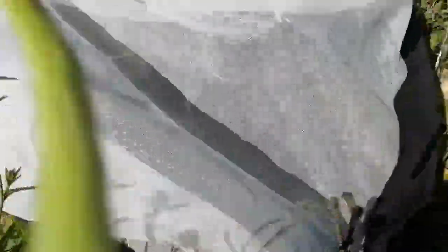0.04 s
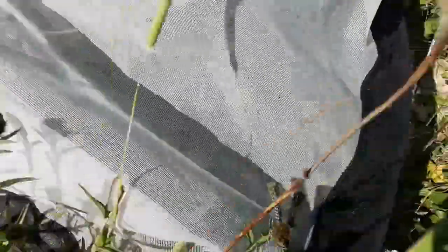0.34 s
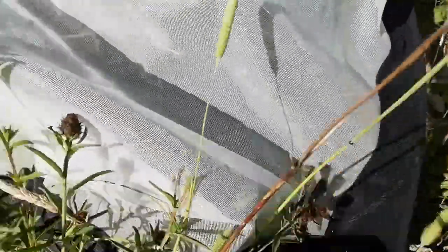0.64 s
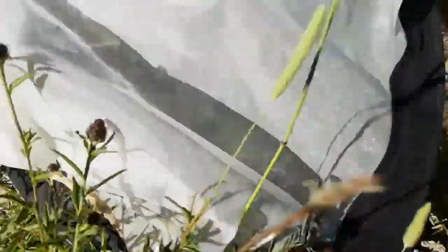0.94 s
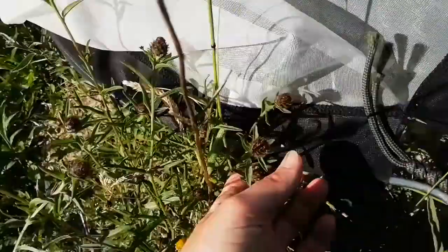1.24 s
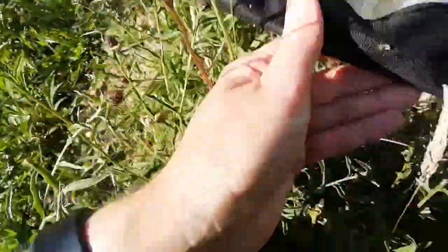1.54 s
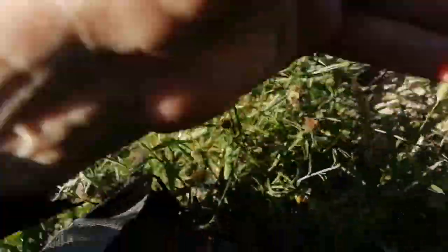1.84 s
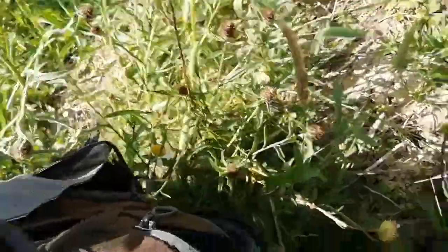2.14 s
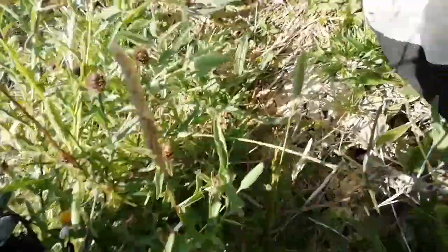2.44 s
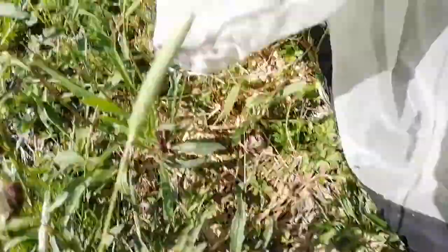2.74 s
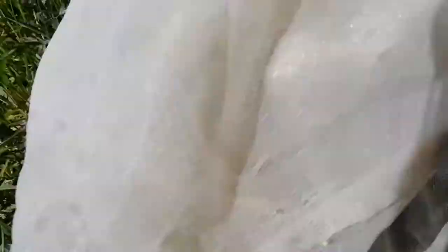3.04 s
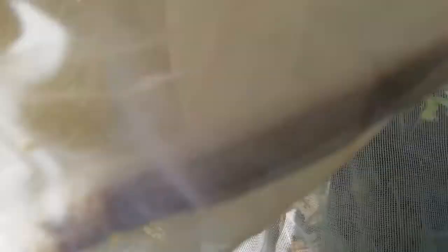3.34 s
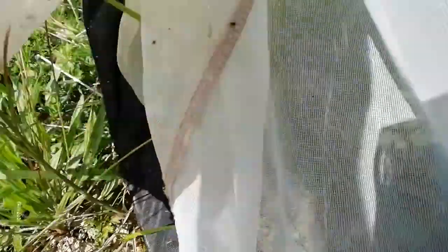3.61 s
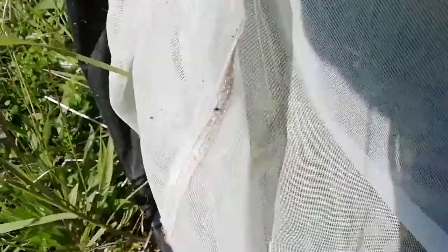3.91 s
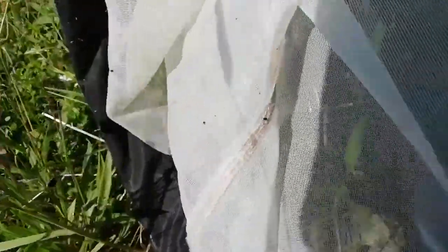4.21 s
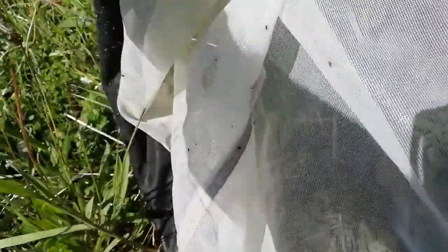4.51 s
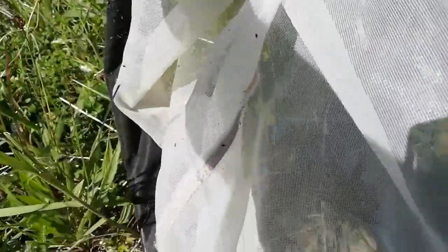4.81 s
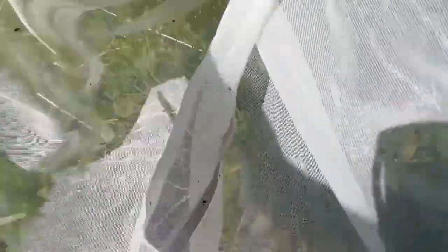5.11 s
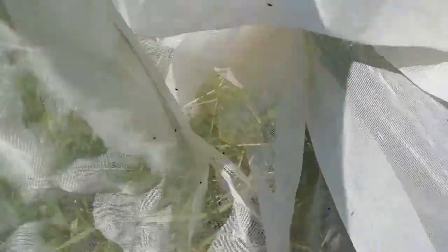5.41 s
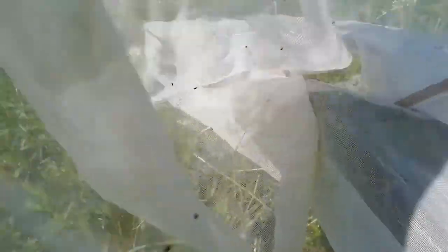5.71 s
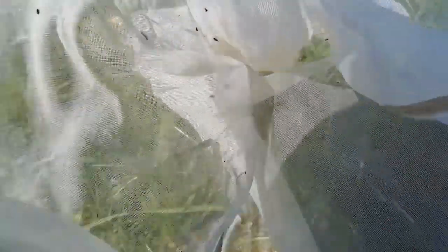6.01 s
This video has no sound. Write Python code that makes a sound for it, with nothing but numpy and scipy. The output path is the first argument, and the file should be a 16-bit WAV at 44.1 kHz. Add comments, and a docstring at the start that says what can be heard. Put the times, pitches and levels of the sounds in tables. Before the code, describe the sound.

Mesh netting hisses and crackles as it is dragged over grass, with snapping stems, microphone bumps and light wind.

```python
"""A mesh sweep net is turned over in grass, right at a hand-held camera, above a light rumbling wind.
At first stems snap and fingers rub and bump the camera near its right microphone, while the mesh
hisses and crackles over the stems, pull after pull. Just after one second the metal hoop clinks once;
later, small metal fittings tinkle. Around four seconds the pulls grow faint, and at five seconds
the hiss swells again."""
import sys
import numpy as np
from scipy import signal
from scipy.fft import rfft, irfft, next_fast_len
from scipy.io import wavfile
from scipy.ndimage import uniform_filter1d, map_coordinates

SR = 44100
rng = np.random.default_rng(int(sys.argv[2]) if len(sys.argv) > 2 else 0)


def unload_wav(signal):
    """Save mono or channel-first audio to the path in sys.argv[1] as 16-bit WAV at rate SR, clipped to [-1, 1]."""
    wavfile.write(
        sys.argv[1],
        SR,
        np.round(np.clip(np.atleast_2d(signal).T, -1, 1) * 32767).astype(np.int16),
    )


N = 267246

# In the tables, t is the start time and t60 is the time a sound takes to fade by 60 dB.
# Levels are relative: each source adds its own gain. Pan is left minus right, so below 0 is to the right.


def amp(db):
    """Turn decibels into a gain to multiply by."""
    return 10 ** (np.asarray(db) / 20)


def unit(x):
    """Scale a signal to an average power of 1."""
    return x / np.sqrt(np.mean(x ** 2) + 1e-20)


def along(points, hz):
    """Read between (frequency, value) points on a logarithmic frequency axis."""
    freqs, values = np.transpose(points)
    return np.interp(np.log(hz + 1), np.log(freqs + 1), values)


def wobble(rate):
    """A smooth random curve that passes through `rate` new values a second."""
    values = rng.standard_normal(int(N * rate / SR) + 4)
    return map_coordinates(values, [np.arange(N) * rate / SR])


def filtered(x, response):
    """Multiply each frequency in x by response(frequency)."""
    size = x.shape[-1]
    padded = next_fast_len(size + 4096)
    hz = np.fft.rfftfreq(padded, 1 / SR)
    return irfft(rfft(x, padded) * response(hz), padded)[..., :size]


def coloured(x, spectrum):
    """Shape the tone of x with a table of f/Hz, level/dB."""
    return filtered(x, lambda hz: amp(along(spectrum, hz)))


def panned(pan_db):
    """Left and right gains with an average power of 1."""
    pan_db = np.atleast_1d(pan_db)
    gains = amp(np.array([pan_db, -pan_db]) / 2)
    return gains / np.sqrt(np.mean(gains ** 2, axis=0))


def add(track, start, sound):
    """Mix a stereo sound into the track at `start` seconds."""
    part = track[:, max(round(start * SR), 0):][:, :sound.shape[-1]]
    part += sound[:, :part.shape[1]]


def stereo_noise(size, alike):
    """Left and right noise, from unrelated (alike=0) to identical (alike=1)."""
    shared = np.sqrt(alike) * rng.standard_normal(size)
    return shared + np.sqrt(1 - alike) * rng.standard_normal((2, size))


def jolt(t, t60, tail_db, alike):
    """An impact: a sudden spike, a burst of noise and a fainter tail."""
    fade = amp(-60 * t / t60) + amp(tail_db - 60 * t / 0.058)
    spike = 2.5 * (np.arange(len(t)) == SR // 3000)
    return stereo_noise(len(t), alike) * fade + spike


def stroke(start, length, attack_s=0.044, sag_db_per_s=0, release_db_per_s=156):
    """Gain of one movement: it gathers speed, holds or sags, then slides to rest."""
    gain, first = np.zeros(N), max(int(start * SR), 0)
    t = np.arange(first, min(N, int((start + length + 1) * SR))) / SR - start
    fall_db = sag_db_per_s * t + release_db_per_s * np.maximum(t - length, 0)
    gain[first:first + len(t)] = np.clip(t / attack_s, 0, 1) * amp(-fall_db)
    return gain


def patchy(x, patch_db):
    """Folds come and go, each lifting or lowering its own band of frequencies for a moment."""
    bands = signal.stft(x, nperseg=512)[2]
    patches = uniform_filter1d(rng.standard_normal(bands.shape[1:]), size=5, axis=0)  # smooth over pitch
    patches = uniform_filter1d(patches, size=12, axis=1)  # smooth over time
    return signal.istft(bands * amp(patch_db * unit(patches)), nperseg=512)[1][:, :N]


def friction(spectrum, catches_per_s, spread_db, grain_db, flutter_db, alike):
    """Rubbing: tiny slips blur into a hiss, single catches stand out, and the pressure flutters."""
    caught = rng.random(N) < catches_per_s / SR
    strength = amp(spread_db * np.minimum(rng.exponential(size=N), 3))
    power = signal.lfilter([1], [1, -np.exp(-1 / (.0009 * SR))], caught * strength ** 2)  # catches fade
    pressure = amp(flutter_db * (wobble(90) + wobble(30)))
    contact = np.sqrt(1 + amp(grain_db) ** 2 * power / power.mean()) * pressure
    rubbing = patchy(contact * stereo_noise(N, alike), patch_db=2.3)
    return unit(coloured(rubbing, spectrum))


def wind():
    """Moving air: a low rumble, nearly alike at both microphones, with a faint hiss above it."""
    # Strength of the breeze: t/s, level/dB
    breeze = [(0, -60), (1.2, -56.5), (3, -56.5), (3.5, -58.5), (4.2, -61), (4.9, -59), (6.06, -59)]
    # Tone of the wind: f/Hz, level/dB
    spectrum = [(20, -8.5), (45, 1.5), (85, -3), (150, -6), (230, -13), (400, -19), (550, -31), (700, -23),
                (1000, -26), (1400, -26), (2200, -39.5), (5000, -29.5), (15000, -35.5)]
    breeze_db = np.interp(np.arange(N) / SR, *np.transpose(breeze))
    gusts = amp(.8 * wobble(9))
    return amp(breeze_db + 3) * gusts * unit(coloured(stereo_noise(N, alike=0.98), spectrum))


def fingers():
    """Skin lets go, drags over the camera beside the right microphone, slows and grips again."""
    # Finger slips: t/s, length/s, level/dB
    slips = [(-.04, 0.33, -37), (0.415, 0.028, -61), (0.556, 0.031, -33.5), (0.641, .09, -37.5),
             (0.766, 0.046, -37.5), (1.018, .05, -48), (1.568, 0.12, -51.5), (2.589, 0.057, -41),
             (2.708, 0.098, -50), (3.024, 0.22, -55.5), (5.787, 0.051, -62)]
    # Tone of rubbing skin: f/Hz, level/dB
    spectrum = [(40, -32), (120, -0.5), (500, -1), (1000, -0.5), (1500, -12.5), (2500, -12), (5000, -60),
                (12000, -32)]
    motion = amp(-69)  # the holding hand is never quite still
    for start, length, db in slips:
        motion += amp(db) * stroke(start, length, attack_s=0.0069, sag_db_per_s=39, release_db_per_s=252)
    drag = friction(spectrum, catches_per_s=900, spread_db=2, grain_db=-4, flutter_db=1.2, alike=.88)
    return amp(-1.5) * motion * drag * panned(-5)


def bumps():
    """Soft blows rock the camera with a short, low thud."""
    # Blows on the camera body: t/s, level/dB, f/Hz, t60/s
    blows = [(0.035, -21, 228, 0.0089), (0.0704, -25, 181, 0.022), (.1317, -28.5, 98, 0.14),
             (0.1479, -20, 196, 0.013), (.191, -24, 298, 0.014), (.2345, -28, 203, .021),
             (0.2573, -22.5, 186, .018), (.275, -31.5, 169, 0.058), (0.5648, -16, 240, 0.018),
             (0.7671, -24.5, 236, 0.01), (1.034, -29.5, 148, 0.015), (1.659, -25.5, 191, .023),
             (2.283, -35, 275, 0.0088), (2.514, -27, 156, 0.037), (2.649, -36, 300, 0.063),
             (2.708, -25.5, 109, 0.078), (2.851, -39.5, 157, .031), (3.189, -30, 185, 0.033),
             (4.958, -35, 336, 0.02)]
    out, t = np.zeros((2, N)), np.arange(SR // 6) / SR
    for start, db, hz, t60 in blows:
        rise = 1 - np.exp(-t / 0.00075)
        thud = np.sin(2 * np.pi * hz * t) * amp(-60 * t / t60) * rise
        add(out, start, amp(db + 0.5) * thud / np.abs(thud).max() * panned(-1.1))
    return out


def taps():
    """Stems, hoop and fingers tap: each jolt passes through one broad resonance that barely rings."""
    # Dry contacts: t/s, level/dB, f/Hz, pan/dB
    contacts = [(0.0334, -19, 870, -24), (.068, -23.5, 1300, -15), (0.1075, -24, 1070, -18),
                (0.1311, -18.5, 1210, -9), (0.1525, -20, 2840, -25), (0.5641, -8.5, 830, -9),
                (0.5647, -12, 3500, -28), (0.7669, -21.5, 636, -24), (1.027, -24.5, 850, -29),
                (1.3421, -32, 1260, -11), (1.6627, -29, 940, 36), (2.0084, -30, 3240, -4),
                (2.283, -35, 1010, -22), (2.416, -32.5, 1800, -9), (2.854, -26.5, 1570, -20),
                (3.1892, -25, 980, -7), (3.1901, -24.5, 3760, 20), (3.3155, -23.5, 1740, -11),
                (3.5332, -40, 1460, -13), (3.8291, -29.5, 4300, -9), (4.9492, -32.5, 1900, 19),
                (4.9573, -24.5, 3630, -19), (5.157, -22, 3800, -6), (5.83, -31.5, 1090, -19),
                (5.8929, -25, 1040, 3), (5.8946, -26.5, 3030, -21)]
    out, t = np.zeros((2, N)), np.arange(SR // 20) / SR
    for start, db, hz, pan_db in contacts:
        hit = jolt(t, t60=0.011, tail_db=-8, alike=0.65)
        tap = filtered(hit, lambda f: (1j * f * hz * 1.3 / (hz * hz - f * f + 1j * f * hz * 1.25)) ** 2)
        tap /= np.std(tap[:, :SR // 300])  # the first few milliseconds set the level
        add(out, start, amp(db - 14) * tap * panned(pan_db))
    return out


def tinkles():
    """Small metal fittings of the net ring, each with one thin, short tone."""
    # Rings of the fittings: t/s, level/dB, f/Hz, t60/s
    rings = [(1.825, -32.5, 4000, 0.095), (1.828, -45, 3130, 0.15), (2.0064, -35.5, 3100, 0.051),
             (2.051, -39, 7360, 0.09), (4.424, -41, 4580, .04), (4.957, -27, 3720, 0.024)]
    out, t = np.zeros((2, N)), np.arange(SR // 6) / SR
    for start, db, hz, t60 in rings:
        add(out, start, amp(db - 4 - 60 * t / t60) * np.sin(2 * np.pi * hz * t) * panned(-21))
    return out


def clink():
    """The metal hoop is struck: a dry clack and a brief ring, muffled by its cloth sleeve."""
    # The knock on the hoop: t/s, level/dB
    knocks = [(1.1458, -19)]
    # Tones the hoop rings with: f/Hz, level/dB, t60/s
    tones = [(2330, 0.5, 0.068), (2510, 1, 0.038), (2800, -10, 0.074), (3570, 1, 0.069), (3800, 0, 0.057),
             (4660, 3.5, 0.041)]
    # Tone of the clack: f/Hz, level/dB
    spectrum = [(200, -26), (600, -1), (1600, -5), (2400, 1), (4700, -1), (6000, -18), (16000, -27)]
    out, t = np.zeros((2, N)), np.arange(SR // 6) / SR
    rise = 1 - np.exp(-t / 0.00037)
    for start, db in knocks:
        ring = sum(amp(level - 60 * t / t60) * np.sin(2 * np.pi * (hz * t + rng.random((2, 1))))
                   for hz, level, t60 in tones)
        clack = coloured(jolt(t, t60=0.044, tail_db=-18, alike=0.6), spectrum)
        add(out, start, amp(db - 13.5) * (ring * rise + amp(4.5) * clack) * panned(-11))
    return out


def cracks(events):
    """Sharp cracks with a brief fizz, brighter for thin stems; events are laid out as in snaps()."""
    # Tone of a stem's crack, with the microphone port's ring near 8.5 kHz: f/Hz, level/dB
    spectrum = [(300, -53), (1200, -29.5), (2200, -19.5), (4500, -9), (6500, 0), (8200, 9), (9300, 2.5),
                (11000, -8.5), (16000, -28.5)]
    out, t = np.zeros((2, N)), np.arange(SR // 20) / SR
    for start, db, pan_db, t60, tilt in events:
        tilted = [(hz, level + tilt * np.log2(max(hz, 3000) / 8000)) for hz, level in spectrum]
        crack = coloured(jolt(t, t60, tail_db=-22, alike=.7), tilted)
        crack /= np.std(crack[:, :SR // 800])  # the first instant sets the level
        add(out, start, amp(db - 11) * crack * panned(pan_db))
    return out


def ticks(hiss_gain, per_second=14):
    """Small stems give way at random, louder under a stronger pull."""
    pull_db = 20 * np.log10(np.linalg.norm(hiss_gain, axis=0))
    events = []
    for when, strength, side, thinness in rng.random((int(per_second * N / SR), 4)):
        db = pull_db[int(when * N)] + 12.5 + 6 * (strength - .5)
        pan_db = -6 + 20 * (side - .5)
        tilt = 18 * (thinness - .5)
        events.append((when * N / SR, db, pan_db, .009, tilt))
    return cracks(events)


def snaps():
    """Single stems and threads break at set times."""
    # Breaks: t/s, level/dB, pan/dB, t60/s, treble tilt/(dB per octave)
    breaks = [(.003, -4, -33, 0.041, 5.5), (.0091, -12, -25, 0.041, -11.5), (.0338, -17, -26, 0.067, -2),
              (.058, -15, -23, .006, 3), (.108, -13.5, -13, .0063, 5), (.118, -10.5, -10, .007, -4),
              (.1294, -17, -3, 0.011, -6), (.153, -15, -30, 0.0043, -10), (.188, -12.5, -16, 0.019, -4),
              (.234, -16, -18, 0.006, -3), (.257, -9.5, -28, 0.0089, -1.5), (.3447, -7.5, -16, 0.014, 4.5),
              (.5603, -16.5, -21, 0.0066, -13), (.5644, -8, -37, 0.0051, 9), (.9145, -23.5, -24, .012, 35),
              (1.048, -24, -21, 0.015, -17.5), (1.7887, -20.5, -18, 0.0073, -1.5),
              (1.8263, -19, -17, 0.019, -5), (2.007, -20, -11, .016, 3), (2.05, -30, -2, 0.13, 1),
              (2.458, -15, -5, 0.018, -3), (2.5343, -11, -14, 0.014, 3), (3.0139, -19, -2, .008, 11),
              (3.1156, -23, -7, .014, 15), (3.191, -5.5, 28, 0.0032, 24), (3.726, -26, 4, 0.0059, 20),
              (3.742, -22.5, 15, 0.016, 21), (3.8285, -26.5, 13, 0.043, 4), (3.9561, -29, 0, 0.0072, 6),
              (4.158, -38, 7, 0.017, 14), (4.4254, -20.5, -14, .023, 1), (4.641, -28.5, -10, 0.038, 3),
              (4.958, -28, 10, .02, 6), (5.07, -25, 4, 0.02, 14), (5.2633, -19.5, 2, 0.01, -9.5),
              (5.6148, -19, -13, 0.0099, -9), (5.98, -16.5, -20, .0066, -5.5)]
    return cracks(breaks)


def weave():
    """Threads tick over an edge and sing: a rough tone whose pitch differs from pull to pull."""
    # Moments when the weave sings: t/s, length/s, level/dB, f/Hz
    sings = [(.24, 0.09, -55, 4550), (1.355, 0.11, -47.5, 4540), (2.227, 0.33, -55, 3870),
             (4.528, .14, -57, 4130), (4.897, .34, -58, 3690), (5.36, .3, -55, 3925)]
    t = np.arange(N) / SR
    roughness = unit(filtered(stereo_noise(N, alike=0.13), lambda hz: 1 / (1 + (hz / 350) ** 3)))
    tones = sum(amp(db) * stroke(start, length) * np.sin(2 * np.pi * hz * t)
                for start, length, db, hz in sings)
    return np.sqrt(2) * roughness * tones


def cloth(hem_gain):
    """The hem scrapes past on the right, the weave sings, and folds crumple."""
    # Folds of the net collapsing: t/s, length/s, level/dB
    folds = [(-.05, 0.11, -49), (0.407, 0.042, -47), (0.537, 0.051, -43), (0.763, 0.08, -48.5),
             (1.112, 0.16, -50.5), (2.393, 0.53, -56), (2.753, 0.4, -48.5), (4.393, 0.24, -69),
             (4.894, 0.48, -60.5), (5.35, .7, -60)]
    # Tone of the hem's scrape: f/Hz, level/dB
    hem_tone = [(1200, -47), (2400, -16.5), (3400, -6.5), (4000, -1), (5400, -2), (7400, 1.5), (8600, 2.5),
                (10000, -19), (15000, -56)]
    # Tone of the crumpling folds: f/Hz, level/dB
    fold_tone = [(300, -2), (700, -5), (1050, 1), (1400, -0.5), (1900, 0), (2500, 1), (3300, -1.5),
                 (6000, -20)]
    collapses = np.linalg.norm([amp(db) * stroke(s, length) for s, length, db in folds], axis=0)
    creasing = amp(-24.5) * hem_gain  # the scraping hem always creases a little
    fold_gain = amp(-66) + np.hypot(creasing, collapses)  # the net keeps settling even at rest
    scrape = friction(hem_tone, catches_per_s=450, spread_db=3.3, grain_db=-2, flutter_db=1.2, alike=.2)
    crumple = friction(fold_tone, catches_per_s=300, spread_db=3, grain_db=-4, flutter_db=1, alike=.3)
    hem = amp(-3) * hem_gain * scrape + weave()
    return hem * panned(-14.5) + amp(-1.5) * fold_gain * crumple * panned(-4)


def pulling():
    """Pulls drag the net over the grass; gives the gains of the hiss (stereo), sizzle and hem."""
    # Pulls: t/s, length/s, hiss level/dB, hiss pan/dB, hem level/dB, sizzle relative to hiss/dB
    pulls = [(-.05, 0.28, -43.5, -10, -39.5, -17), (0.236, 0.083, -35.5, -6, -35, -8),
             (0.34, .1, -46, -8, -45, -6), (0.434, 0.054, -39.5, -8, -37.5, -12),
             (0.544, 0.045, -39, -27, -33.5, -22), (0.634, 0.08, -44.5, -3, -43, -12),
             (0.744, 0.15, -46, -3, -41, -12), (0.934, 0.075, -44, -1, -40, -13),
             (1.065, 0.084, -43, -5, -46.5, -19), (1.117, .14, -39.5, -5, -41, -18),
             (1.24, 0.089, -40, -3, -35.5, -11), (1.326, 0.064, -37, -4, -42, -5.5),
             (1.399, 0.088, -44, -2, -43.5, -24), (1.542, 0.085, -45.5, -5, -42.5, -25),
             (1.647, 0.2, -45.5, -2, -45, -23), (1.869, 0.14, -46.5, -10, -45.5, -13),
             (2.102, 0.089, -48, -4, -50, -13), (2.197, 0.16, -43, -3, -42, -12),
             (2.374, .25, -37, -6, -37, -14), (2.703, 0.26, -44.5, -4, -38.5, -23),
             (2.875, 0.24, -43, -4, -38.5, -27), (3.176, .08, -48, 1, -51, -22),
             (3.278, 0.042, -47.5, -4, -50.5, -28), (3.369, 0.039, -47.5, -3, -49.5, -24),
             (3.644, 0.15, -48, 4, -62, -13), (3.79, 0.067, -51, 7, -50, -16),
             (3.898, 0.085, -55, -1, -54.5, -20), (3.985, 0.043, -49.5, -4, -52, -10),
             (4.184, 0.038, -59, -10, -75, -18), (4.385, 0.14, -52, -6, -50.5, -13),
             (4.578, .07, -55, -3, -50, -25), (4.687, 0.14, -63, 3, -58, -19),
             (4.845, 0.18, -52, 1, -46, -12), (5.01, 0.21, -40, -5.5, -46, -17),
             (5.154, 0.12, -37.5, -5.5, -35.5, -15), (5.334, 0.083, -39.5, -9, -38.5, -22),
             (5.452, 0.18, -41, -12, -41.5, -21), (5.693, 0.22, -47, -4.5, -46, -16),
             (5.89, 0.12, -46.5, 0, -41.5, -9)]
    hiss = np.full((2, N), amp(-63) ** 2 / 2)  # mesh and hem stir faintly even at rest
    hem = np.full(N, amp(-65) ** 2)
    sizzle = np.zeros(N)
    for start, length, db, pan_db, hem_db, sizzle_db in pulls:
        settling = amp(-13.5) * stroke(start, length, release_db_per_s=24)  # lingers after the pull
        power = np.maximum(stroke(start, length), settling) ** 2  # overlapping pulls add in power
        hiss += (amp(db) * panned(pan_db + 2.5)) ** 2 * power
        sizzle += amp(db + sizzle_db) ** 2 * power
        hem += amp(hem_db) ** 2 * power
    return np.sqrt(hiss), np.sqrt(sizzle), np.sqrt(hem)


def mesh(hiss_gain, sizzle_gain):
    """The mesh hisses over the grass in front of both microphones, and sizzles when pulled tight."""
    # Tone of the mesh hiss, with the microphone port's ring near 8.5 kHz: f/Hz, level/dB
    hiss_tone = [(800, -56), (2500, -19), (4500, -20.5), (6500, -11), (7600, -3), (8600, 6.5), (9300, 0.5),
                 (10500, -11.5), (12500, -17.5), (16000, -40)]
    # Tone of the sizzle: f/Hz, level/dB
    sizzle_tone = [(6000, -32), (9500, 15), (12000, 12), (15000, 10), (16500, -34)]
    hiss = friction(hiss_tone, catches_per_s=700, spread_db=3.2, grain_db=-2, flutter_db=1, alike=.6)
    sizzle = friction(sizzle_tone, catches_per_s=700, spread_db=3.2, grain_db=0, flutter_db=1.1, alike=.7)
    return amp(-1) * (hiss_gain * hiss + sizzle_gain * sizzle * panned(-3.1))


def delay_left(x):
    """Sound from the right end of the camera reaches the left microphone late."""
    # Delay at the left microphone: f/Hz, delay/ms
    delays = [(100, 1.2), (350, 0.77), (800, 0.643)]
    left_only = np.array([[1], [0]])
    return filtered(x, lambda hz: np.exp(-2j * np.pi * hz * along(delays, hz) / 1000 * left_only))


def scene():
    """Mix the sounds at the camera's right end with those that reach both microphones at once."""
    hiss_gain, sizzle_gain, hem_gain = pulling()
    right_end = cloth(hem_gain) + fingers() + taps() + bumps() + clink() + tinkles()
    return delay_left(right_end) + mesh(hiss_gain, sizzle_gain) + wind() + snaps() + ticks(hiss_gain)


def record(dry):
    """The camera cuts off the very highest treble."""
    top_hz = 16200
    return filtered(dry, lambda hz: hz < top_hz)


dry = scene()
out = record(dry)
unload_wav(out)
```